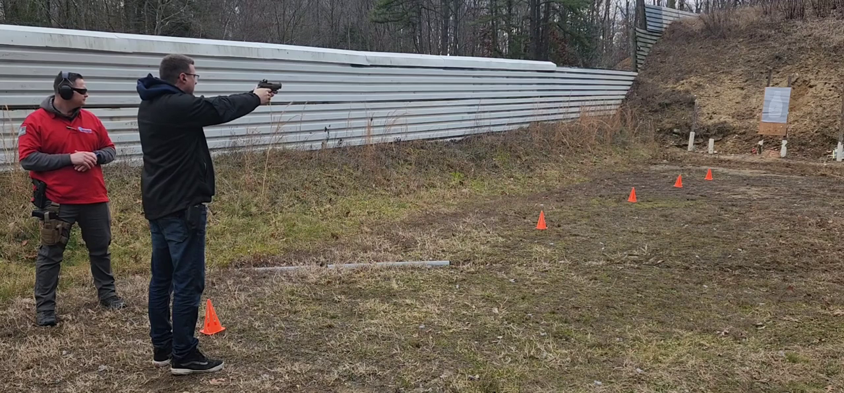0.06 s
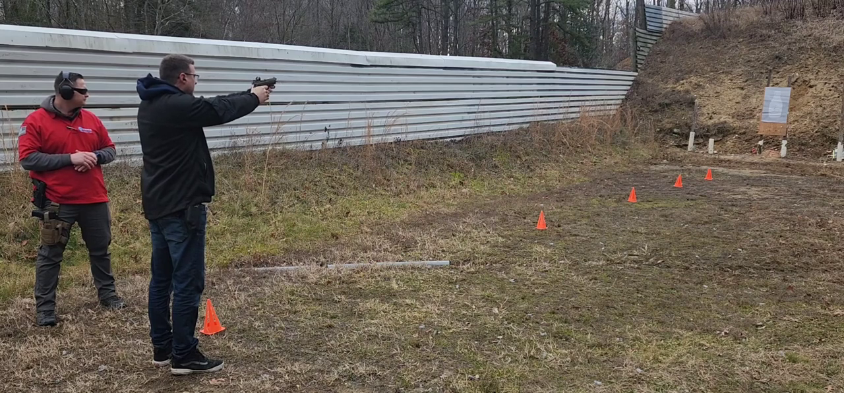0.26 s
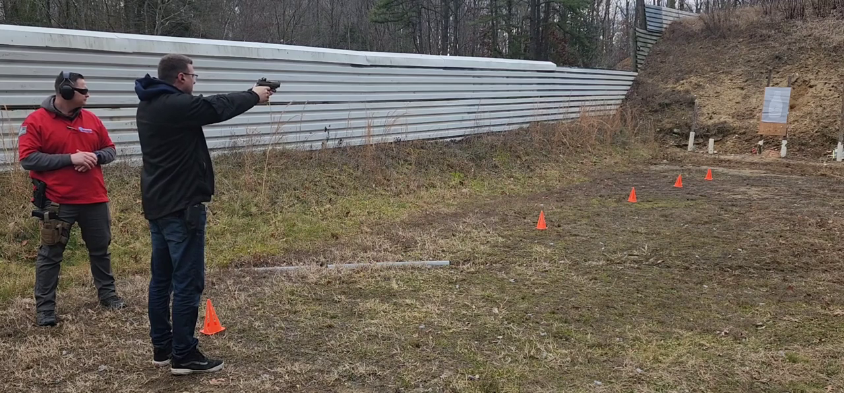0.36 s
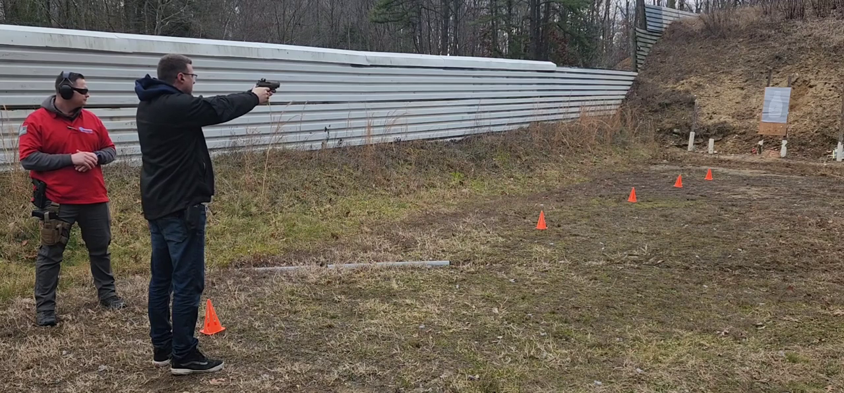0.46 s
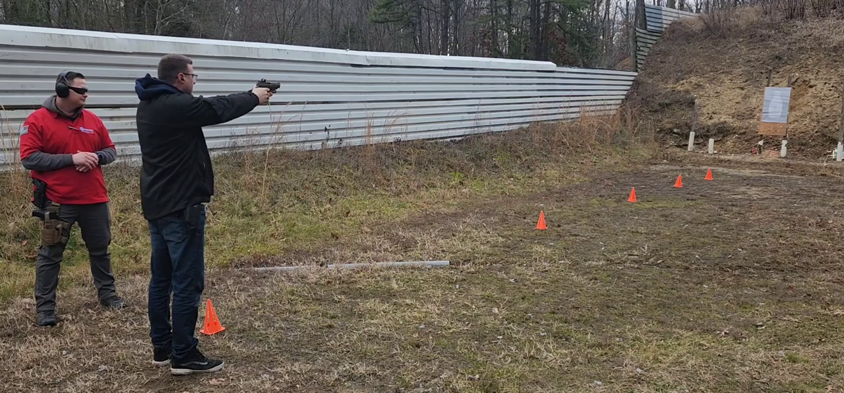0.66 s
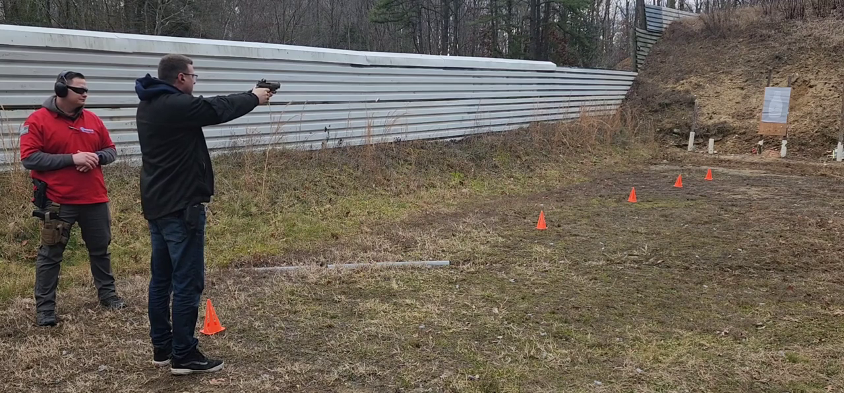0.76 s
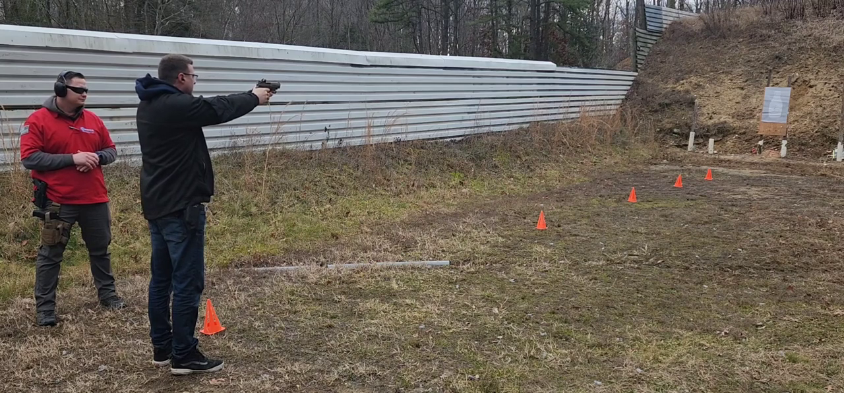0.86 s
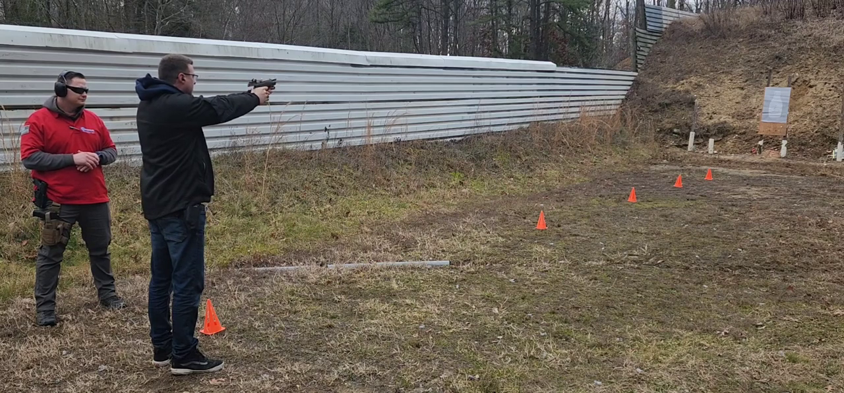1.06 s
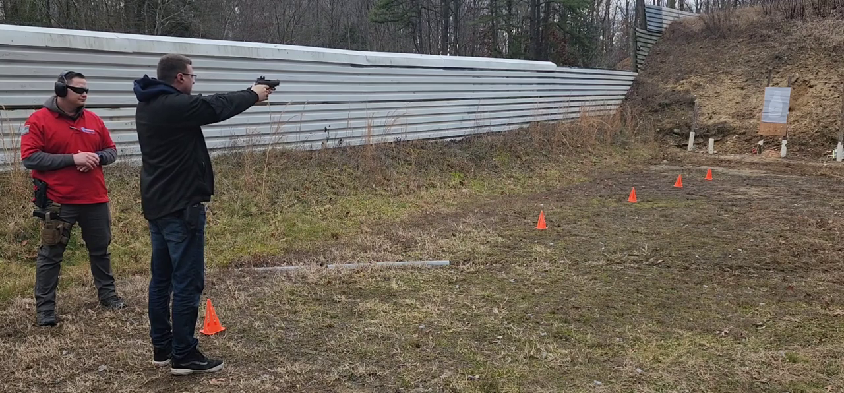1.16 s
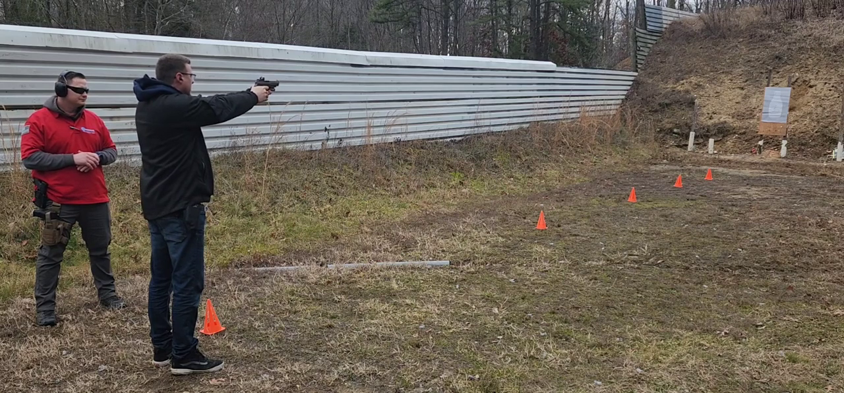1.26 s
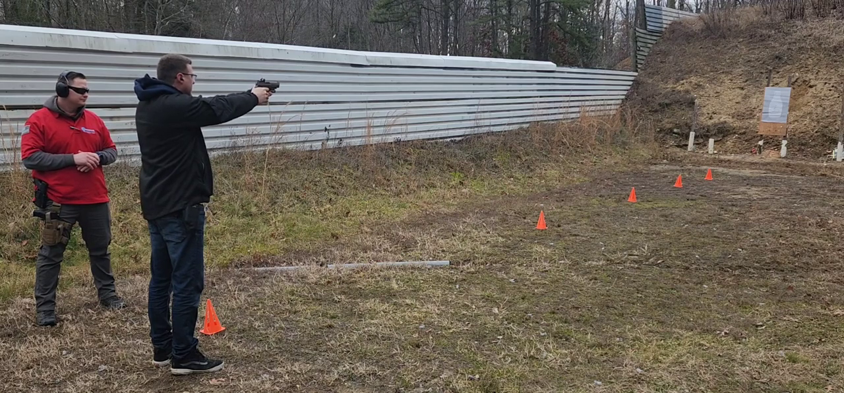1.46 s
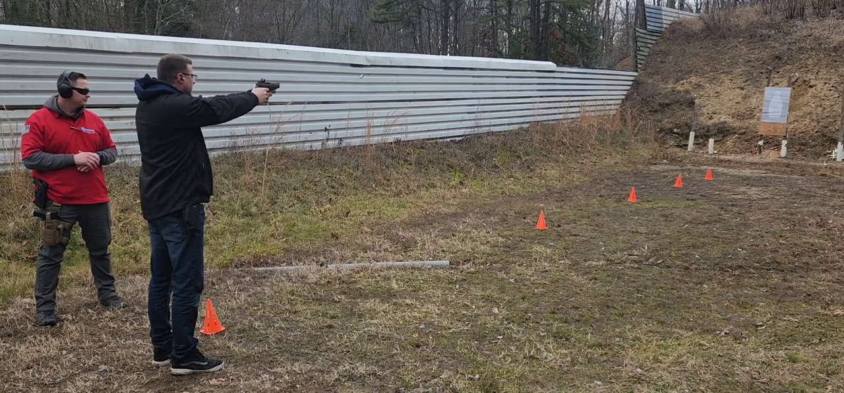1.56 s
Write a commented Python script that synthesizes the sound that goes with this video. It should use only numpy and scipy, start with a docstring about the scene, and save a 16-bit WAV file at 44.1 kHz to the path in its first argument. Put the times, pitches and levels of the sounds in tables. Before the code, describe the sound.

Pistol shots crack twice on an outdoor range, each with quick slap echoes and a fading tail

```python
"""A pistol fires at a fairly steady pace on an outdoor range, a few metres from the microphone.
Each blast is a gas push, noise and sharp fronts, with a bounce off the ground. A corrugated steel side wall
scatters it and rings in drifting tones; the earth berm slaps it back as short noise bursts.
Behind lie far echoes and a long dull tail from the woods, over faint air noise.
The tail of an earlier shot is still fading at the start. Overload at the microphone rounds the peaks."""
import sys
import numpy as np
from scipy import signal
from scipy.fft import rfft, irfft, next_fast_len
from scipy.io import wavfile
from scipy.ndimage import uniform_filter1d, map_coordinates

SR = 44100
rng = np.random.default_rng(int(sys.argv[2]) if len(sys.argv) > 2 else 0)


def persist_wave(psi):
    """Save psi, clipped to +-1, as 16-bit WAV."""
    counts = np.round(np.clip(psi, -1, 1) * 32767).astype(np.int16)
    wavfile.write(sys.argv[1], SR, np.atleast_2d(counts).T)


N = 70560  # samples, 1.6 s
T = np.arange(int(2.4 * SR)) / SR  # time axis of one shot's longest tail, s

# Levels inside a shot are relative to that shot's own level.
# Shots: [t/s, level/dB, extra low gas push/dB]
SHOT_TIMES = [(-.5, 4, 0), (.2102, -0.73, 1), (1.0366, -2.5, 4.5)]

# Extra travel time of each path behind the direct sound, s
GROUND_S, WALL_S, RIBS_S, CORNER_S = 0.003, 0.0085, 0.0142, 0.0236
BERM_S, BANK_S, TREE_S, EDGE_S = 0.0933, 0.1031, 0.2455, 0.266

# Muzzle: the gas wave and its bounce off the ground
PUSH_DB, PUSH_S, PUSH_LOW_HZ, PUSH_HIGH_HZ = -1, 0.00051, 150, 700
PUSH_PAN_DB = -9  # left minus right
GROUND_BOUNCE_DB = -3
# Sharp pressure fronts: [delay t/s, peak level/dB, low edge f/Hz, high edge f/Hz, right-ear lag/ms]
# (a front placed well before the shot falls outside it and is silent)
PRESSURE_FRONTS = [(-0.5, -6.5, 251.5, 2502, .1), (GROUND_S, -7, 220, 1800, -0.059),
                   (RIBS_S, -1.6, 1240, 2800, -.2), (CORNER_S, -0.52, 480, 1100, 0.46),
                   (BERM_S, -11.5, 1260, 1670, -.2), (BERM_S, -13.5, 3330, 4530, -0.25),
                   (BERM_S, -20.5, 55, 490, 0.091)]
# Tearing crack: [f/Hz, level/dB per octave]
CRACK_SPECTRUM = [(40, -42), (170, -18.5), (350, -14.5), (700, -18), (1400, -20), (2700, -25.5),
                  (5500, -20), (9000, -20), (11000, -21.5), (15000, -20.5)]
CRACK_RISE_S, CRACK_HOLD_S, CRACK_T60 = 0.00019, 0.0021, 0.05
# Low roll over the ground: [f/Hz, level/dB per octave]
GROUND_SPECTRUM = [(30, -54), (80, -30.5), (130, -46), (300, -46.5), (1000, -74), (8000, -100)]
GROUND_RISE_S, GROUND_HOLD_S, GROUND_T60 = 0.026, 0.022, 0.25

# Stereo likeness of the nearby scattered sound: [f/Hz, left-right correlation]
NEAR_LIKENESS = [(120, 0.97), (350, 0.3), (1000, -0.41), (2200, -0.03), (8000, -0.055)]
CRACKLE_DB, CRACKLE_PER_S = 2, 740  # unevenness of scattered sound

# Scatter off the steel side wall: [f/Hz, level/dB per octave]
WALL_SPECTRUM = [(40, -46.5), (170, -36.5), (350, -23), (700, -19.5), (1400, -25), (2700, -18), (5500, -21),
                 (8500, -18), (11000, -30), (15000, -21.5)]
WALL_RISE_S, WALL_HOLD_S, WALL_T60 = 0.0034, 0.0067, 0.087
WALL_PAN_DB = 1.5  # left minus right
# Tones of the wall's ribs: [f/Hz, level/dB, decay t60/s]
RIB_TONES = [(487.8, -20.5, 0.14), (684, -16.5, 0.056), (880, -17.5, 0.094), (1190, -21, 0.091),
             (1368, -26.5, 0.19), (2122, -16, 0.074), (2510, -31.5, .06), (2941, -32.5, 0.056)]
RIB_WIDTH_HZ, RIB_LAG_S = 35, 0.0003  # the right ear hears the ribs later

# Slap off the berm and trees, before each echo's tilt: [f/Hz, level/dB per octave]
SLAP_SPECTRUM = [(40, -59), (85, -41.5), (160, -49), (350, -31.5), (700, -29), (1400, -24), (2100, -20.5),
                 (2700, -26.5), (3800, -25.5), (6000, -24.5), (8500, -24.5), (11000, -32.5), (15000, -30)]
# Echoes: [delay t/s, level/dB, decay t60/s, treble tilt/dB per octave]
ECHO_PATHS = [(CORNER_S, -1.5, 0.021, -0.59), (BERM_S, 7, .012, 1), (BERM_S, -11, 0.25, 0),
              (BANK_S, 2, 0.02, 0), (TREE_S, -18.5, .04, 0.33), (EDGE_S, -15, 0.11, -3.42)]
ECHO_RISE_S = 0.00041
# Soft low boom from down range: [f/Hz, level/dB per octave]
BOOM_SPECTRUM = [(40, -74), (100, -47), (180, -35.5), (300, -49.5), (600, -38.5), (1500, -36.5),
                 (5000, -57), (15000, -75)]
BOOM_DELAY_S, BOOM_RISE_S, BOOM_HOLD_S, BOOM_T60 = 0.165, 0.0084, 0.004, 0.2

# Tail from the woods: [f/Hz, level/dB per octave, decay t60/s]
WOODS_BANDS = [(39.4, -65.5, 0.57), (80, -46, 2.2), (158, -51.5, 1.63), (330, -39, 2.36),
               (520, -33.5, 2.13), (794, -35.5, 2.64), (1200, -41.5, 2.56), (2150, -38, 1.65),
               (3200, -43, 1.443), (5200, -37, 0.82), (8860, -33.5, 0.63), (10500, -41, 0.45),
               (15000, -38, 0.49)]
WOODS_RISE_S, WOODS_FLUTTER_DB, WOODS_FLUTTER_PER_S = 0.028, 1.42, 140
WOODS_PAN_DB = 1.33  # left minus right
# Stereo likeness of woods and air: [f/Hz, left-right correlation]
WOODS_LIKENESS = [(80, 1), (300, 0.74), (700, 0.045), (1500, 0), (8000, 0.14)]
# Still outdoor air: [f/Hz, level/dB per octave]
AIR_SPECTRUM = [(30, -79), (100, -87), (500, -62.5), (2000, -75.5), (6000, -78.5), (15000, -100)]

# Microphone: peak limit (full scale = 1) and upper band limit
CEILING, TOP_HZ, TOP_EDGE_HZ = 0.85, 16050, 110


def muzzle(push_db):
    """The blast: a gas push and its ground bounce, a tearing crack, a low roll and sharp fronts by many paths."""
    out = np.zeros((2, SR))
    t = T[:SR // 10]
    u = t / PUSH_S
    pressure = (1 - u) * np.exp(-u)  # jump, then a dip below rest
    pressure = band(pressure, PUSH_LOW_HZ, PUSH_HIGH_HZ)
    push = -amp(PUSH_DB + push_db) * pan(PUSH_PAN_DB) * pressure
    add(out, push, 0)
    add(out, amp(GROUND_BOUNCE_DB) * push, GROUND_S)
    add(out, burst(CRACK_SPECTRUM, CRACK_RISE_S, CRACK_HOLD_S, CRACK_T60), 0)
    add(out, burst(GROUND_SPECTRUM, GROUND_RISE_S, GROUND_HOLD_S, GROUND_T60), 0)
    click = 1. * (t == 0)
    for delay, db, low_hz, high_hz, lag_ms in PRESSURE_FRONTS:
        front = band(click, low_hz, high_hz)
        front = -amp(db) * front / abs(front).max()
        add(out, np.outer([1, 0], front), delay)
        add(out, np.outer([0, 1], front), delay + lag_ms / 1000)
    return out


def wall():
    """The corrugated wall scatters the blast, and its regular ribs ring in tones of drifting phase."""
    out = burst(WALL_SPECTRUM, WALL_RISE_S, WALL_HOLD_S, WALL_T60)
    t = T[:out.shape[1]]
    ear_time = t - np.array([[0], [RIB_LAG_S]])
    rise = np.minimum(t / WALL_RISE_S, 1)
    for hz, db, t60 in RIB_TONES:
        # a random walk of phase, separate in each ear, widens the tone
        steps = rng.standard_normal(out.shape)
        drift = np.cumsum(steps, axis=1) * np.sqrt(2 * np.pi * RIB_WIDTH_HZ / SR)
        drift = uniform_filter1d(drift, size=100, axis=1)
        phase = 2 * np.pi * (hz * ear_time + rng.random()) + drift
        out = out + amp(db) * np.sin(phase) * rise * fade(t - WALL_HOLD_S, t60)
    return out * pan(WALL_PAN_DB)


def berm():
    """Bright slaps of scattered sound return from the berm and the trees behind, with a soft low boom."""
    out = np.zeros((2, SR))
    for delay, db, t60, tilt_db in ECHO_PATHS:
        colour = [(hz, level + tilt_db * np.log2(hz / 2000)) for hz, level in SLAP_SPECTRUM]
        add(out, amp(db) * burst(colour, ECHO_RISE_S, 0, t60), delay)
    add(out, burst(BOOM_SPECTRUM, BOOM_RISE_S, BOOM_HOLD_S, BOOM_T60), BOOM_DELAY_S)
    return out


def woods():
    """Countless trunks return a fluttering tail: noise that decays per band, treble sooner than mids."""
    table = np.array(WOODS_BANDS)
    source = noise(table[:, :2], WOODS_LIKENESS, size=len(T))
    hz, t, spectra = signal.stft(source, SR, nperseg=1024)
    t60 = along(table[:, ::2], hz)[:, None]
    tail = signal.istft(spectra * fade(t, t60), SR, nperseg=1024)[1][:, :len(T)]
    knots = T * WOODS_FLUTTER_PER_S
    flutter = map_coordinates(rng.standard_normal(size=1000), [knots], mode='wrap')
    rise = np.minimum(T / WOODS_RISE_S, 1)
    return tail * rise * amp(WOODS_FLUTTER_DB * flutter) * pan(WOODS_PAN_DB)


def air():
    """Still outdoor air: steady faint noise under everything."""
    return noise(AIR_SPECTRUM, WOODS_LIKENESS, size=N)


def burst(octaves, rise, hold, t60):
    """Scattered sound that rises, holds and dies, crackling as single reflections come in."""
    t = T[:SR // 2]
    crackle = map_coordinates(rng.standard_normal(size=2000), [t * CRACKLE_PER_S], mode='wrap')
    envelope = np.minimum(t / rise, 1) * fade(t - rise - hold, t60)
    return noise(octaves, NEAR_LIKENESS, size=len(t), grain=amp(CRACKLE_DB * crackle)) * envelope


def noise(octaves, alike, size, grain=1):
    """Stereo noise of given octave levels and left-right likeness; grain makes it uneven in time."""
    hz = np.fft.rfftfreq(size, 1 / SR)
    turn = np.arccos(np.clip(along(alike, hz), -1, 1)) / 2  # splits power between mid and side
    octave_share = np.sqrt(SR / 2 / np.log(2) / np.maximum(hz, 20))
    gain = amp(along(octaves, hz)) * octave_share
    white = rng.standard_normal((2, size)) * grain / np.sqrt(np.mean(np.square(grain)))
    mid, side = irfft(rfft(white) * gain * [np.cos(turn), np.sin(turn)], size)
    return np.array([mid + side, mid - side])


def band(x, low_hz, high_hz):
    """Causal band-pass."""
    high_hz = np.clip(high_hz, low_hz + 20, SR / 2 - 20)
    sos = signal.butter(2, [low_hz, high_hz], 'band', fs=SR, output='sos')
    return signal.sosfilt(sos, x)


def fade(t, t60):
    """Exponential decay by 60 dB in t60."""
    return np.exp(-np.log(1000) * np.maximum(t, 0) / t60)


def amp(db):
    """Decibels to gain."""
    return 10 ** (np.asarray(db) / 20)


def along(points, hz):
    """Read (f/Hz, value) points on a log frequency axis."""
    f, v = np.transpose(points)
    return np.interp(np.log(hz + 1), np.log(f + 1), v)


def pan(db):
    """Left and right gains for a level difference."""
    return amp(np.array([[db], [-db]]) / 2)


def add(out, x, s):
    """Mix x into out from time s on, dropping what falls outside."""
    i = int(round(s * SR))
    x, i = x[:, max(-i, 0):], max(i, 0)
    n = max(min(x.shape[1], out.shape[1] - i), 0)
    out[:, i:i + n] += x[:, :n]


def scene():
    """Every shot with its answers from wall, berm and woods, over still outdoor air."""
    out = air()
    for s, db, push_db in SHOT_TIMES:
        gain = amp(db)
        add(out, gain * muzzle(push_db), s)
        add(out, gain * wall(), s + WALL_S)
        add(out, gain * berm(), s)
        add(out, gain * woods(), s)
    return out


def record(dry):
    """The overloaded microphone rounds the peaks; a steep low-pass then closes the top of the band."""
    clipped = dry / (1 + (dry / CEILING) ** 4) ** (1 / 4)
    m = next_fast_len(N + SR // 2)  # padded against wrap-around
    hz = np.fft.rfftfreq(m, 1 / SR)
    passed = (1 - np.tanh((hz - TOP_HZ) / TOP_EDGE_HZ / 2)) / 2
    return irfft(rfft(clipped, m) * passed, m)[:, :N]


dry = scene()
out = record(dry)
persist_wave(out)
```